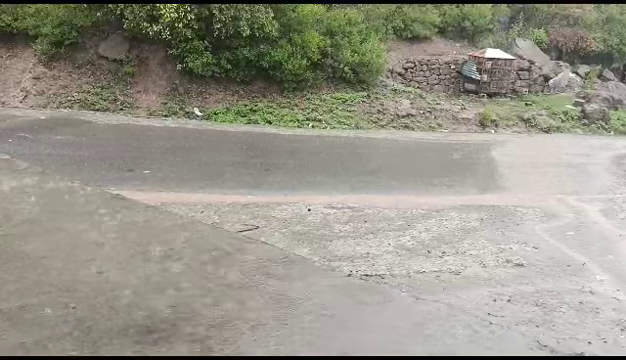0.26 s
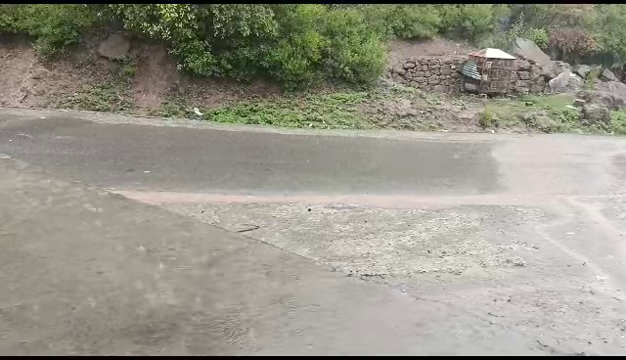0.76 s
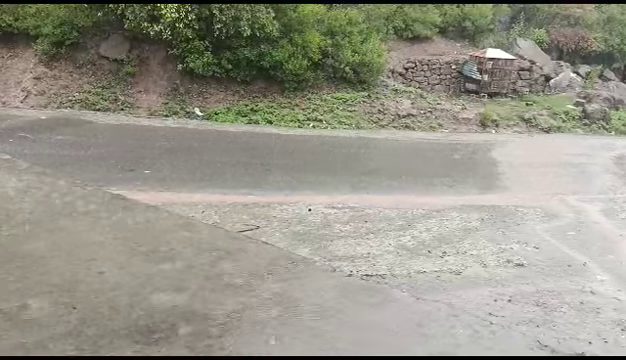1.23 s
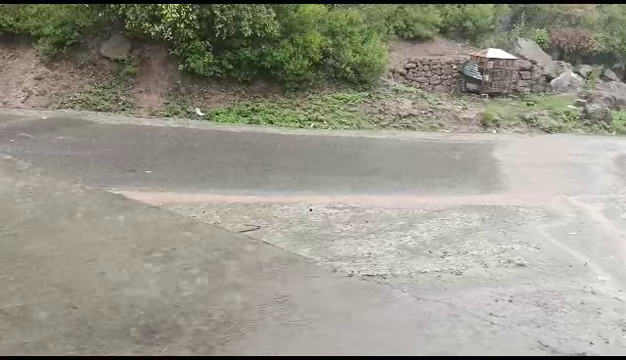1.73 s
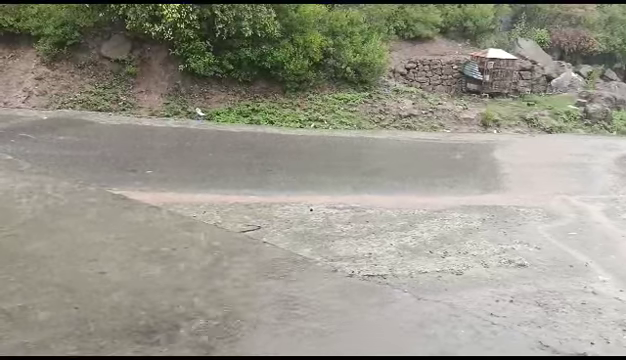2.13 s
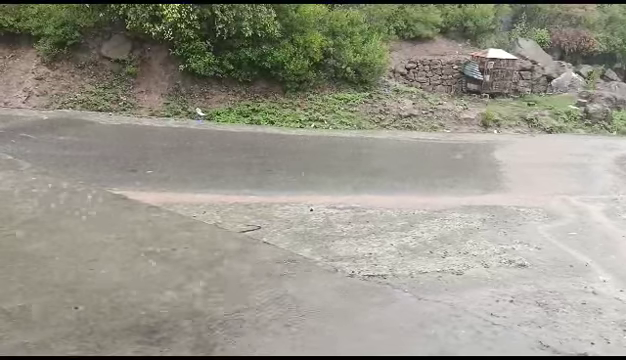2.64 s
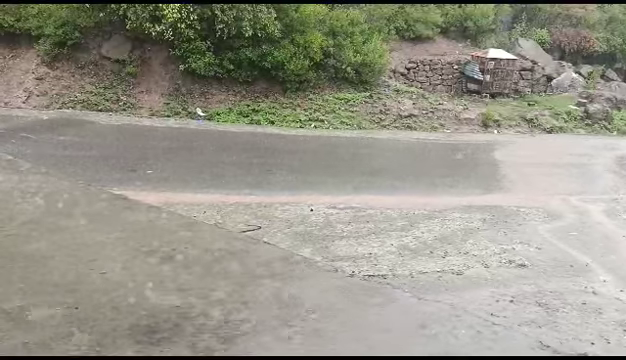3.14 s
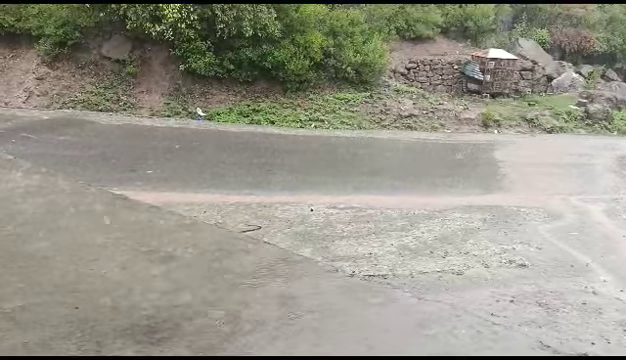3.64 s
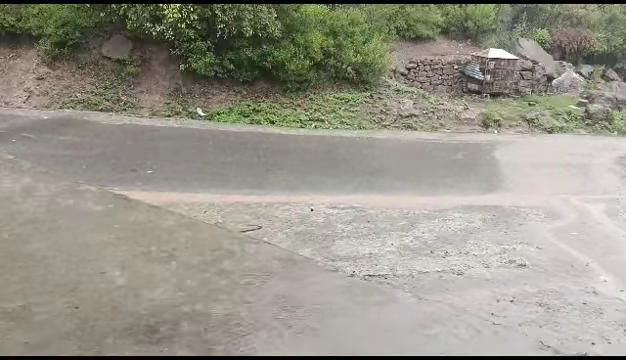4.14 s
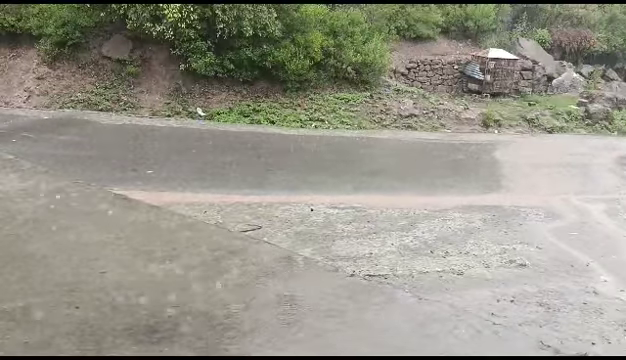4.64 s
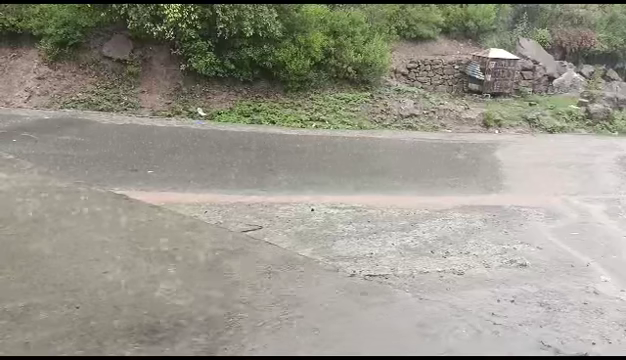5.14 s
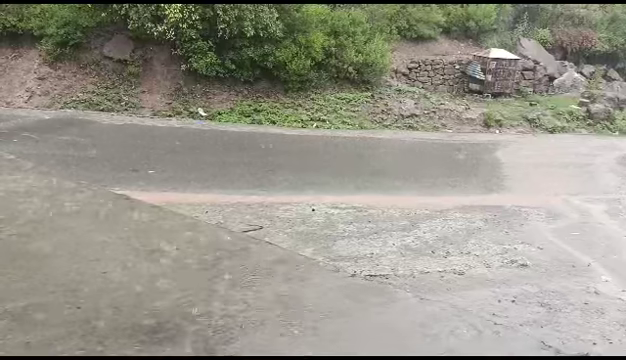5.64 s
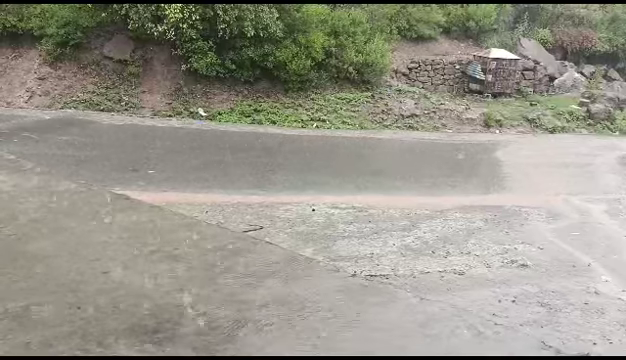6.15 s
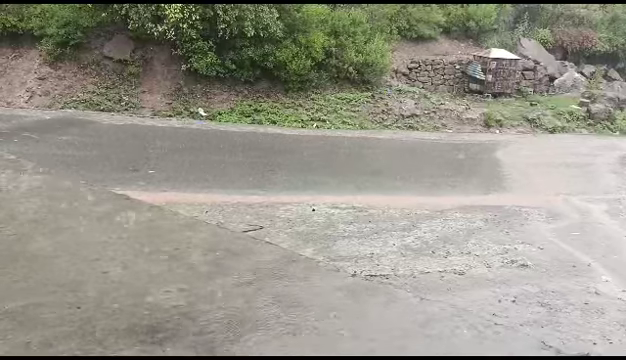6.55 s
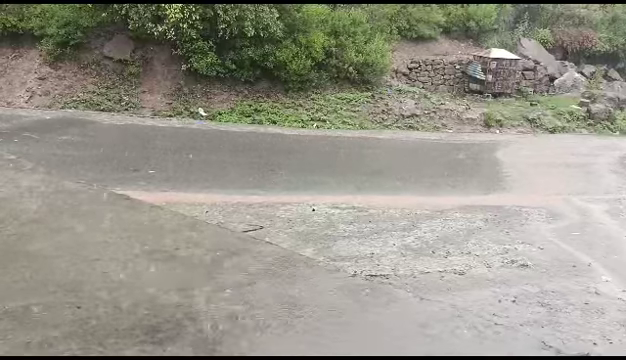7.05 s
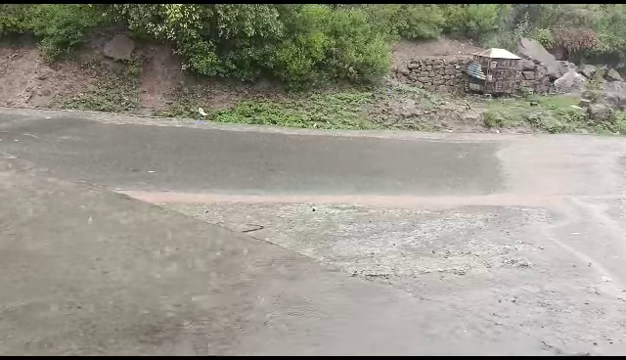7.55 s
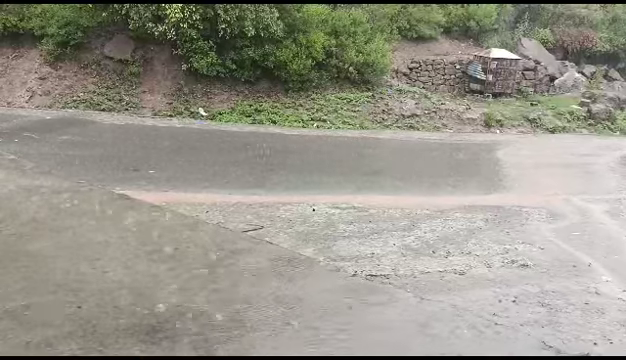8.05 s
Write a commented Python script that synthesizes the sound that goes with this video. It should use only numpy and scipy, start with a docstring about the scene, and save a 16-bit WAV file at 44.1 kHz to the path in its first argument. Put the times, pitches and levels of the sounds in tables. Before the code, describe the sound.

Constant rainfall on wet asphalt, crisp close drips and heavier splats over a dull distant wash, with slight hand creaks and one quick triple bump.

```python
"""Steady rain on a wet road, heard through the two unlike microphone ports of a hand-held phone.
Far rain is a wash of wandering noise over a dull roar; near drops patter as random clicks with a spray.
Hard drops tick, heavy ones splat as short damped tones with a spatter, spills are shaped noise bursts,
and bubbles sing as damped tones. The grip rubs as resonant noise, creaks as a wavering slip tone
and knocks the case into ringing with three quick blows."""
import sys
import numpy as np
from scipy import signal
from scipy.fft import rfft, irfft
from scipy.io import wavfile
from scipy.ndimage import uniform_filter1d

SR = 44100
rng = np.random.default_rng(int(sys.argv[2]) if len(sys.argv) > 2 else 0)


def transcribe(u):
    """Save the signal u as a 16-bit wav file named by the first command-line argument.

    u: samples, shape (n,) or (channels, n), limited to [-1, 1]; the rate is SR.
    q: integer samples, one column per channel.
    """
    v = np.clip(np.atleast_2d(u).T, -1, 1)
    q = np.round(v * 32767).astype(np.int16)
    wavfile.write(sys.argv[1], SR, q)


N = 365570


def gain_of(db):
    """Amplitude factor for a level in dB."""
    return 10 ** (np.asarray(db) / 20)


def evened(x):
    """Bring a signal to an rms of one."""
    return x / np.sqrt(np.mean(x ** 2) + 1e-20)


def read(points, hz):
    """Read a curve between its points on a logarithmic frequency scale."""
    point_hz, value = np.transpose(points)
    return np.interp(np.log(hz + 1), np.log(point_hz + 1), value)


def over_time(rows, t):
    """Read each column of a table whose first column is time."""
    s, *columns = np.transpose(rows)
    return [np.interp(t, s, column) for column in columns]


def add(mix, s, sound):
    """Lay a sound into the mix at s seconds, cut off at the mix's end."""
    part = mix[..., round(s * SR):][..., :sound.shape[-1]]
    part += sound[..., :part.shape[-1]]


def resonate(x, hz, width):
    """Two passes of a one-pole resonance of the given width in Hz."""
    pole = np.exp((2j * np.pi * hz - np.pi * width) / SR)
    return signal.lfilter([1], [1, -2 * pole, pole ** 2], x).real


def ping(hz, t60, rise, glide=0.):
    """A damped tone of peak one whose pitch may climb, as a bubble's does."""
    t = np.arange(round(t60 * SR)) / SR
    tone = np.sin(2 * np.pi * hz * t * (1 + glide * t / t60))
    tone = tone * gain_of(-60 * t / t60) * (1 - np.exp(-t / rise))
    return tone / abs(tone).max()


# Strength of the near rain. Each row: time in seconds, strength in dB (only its changes are used).
RAIN = [(0.0, -50), (0.46, -50.5), (0.71, -49), (1.15, -50.5), (2.12, -49.5), (2.52, -49), (2.7, -50),
        (3.05, -49), (3.55, -49.5), (4.2, -50.5), (4.82, -49), (5.38, -50), (6.19, -49.5), (6.72, -50.5),
        (7.06, -49.5), (8.29, -49.5)]
QUICK_DB, QUICK_HZ = .65, (2.5, 14)  # quick changes of the near rain: rms depth, range of rates
QUICK_TURNS = rng.random(30)  # their starting phases in turns


def rainfall(t):
    """Slow and quick changes of the near rain in dB; the right port hears less of them."""
    db, = over_time(RAIN, t)
    rates = np.geomspace(*QUICK_HZ, len(QUICK_TURNS))
    quick = evened(sum(np.sin(2 * np.pi * (hz * t + turn)) for hz, turn in zip(rates, QUICK_TURNS)))
    return (db - db.mean() + QUICK_DB * quick) * np.array([[1], [.6]])


# Likeness of the two ports in the far rain. Each row: frequency in Hz, left-right correlation.
SAME = [(60, .93), (130, .9), (290, 0.8), (640, .48), (1000, 0), (1300, -0.55), (1700, -0.2), (2200, 0)]


def port_pair(left, other, hz):
    """Left and right spectra as alike as SAME tells at each frequency."""
    same = np.clip(read(SAME, hz), -1, 1).reshape(-1, *[1] * (left.ndim - 1))
    return np.array([left, same * left + np.sqrt(1 - same ** 2) * other])


def wash():
    """Far rain as noise whose level wanders at random; the ports' main band follows the near rain most."""
    frames, hz = N // 128 + 5, np.fft.rfftfreq(512, 1 / SR)
    a, b, c, d, broad, narrow = rng.standard_normal((frames, 257, 6)).T
    # slow random level changes in narrow bands, quicker ones in broader bands
    narrow = uniform_filter1d(uniform_filter1d(narrow, size=3, axis=0), size=40, axis=1)
    broad = uniform_filter1d(uniform_filter1d(broad, size=4, axis=0), size=10, axis=1)
    flicker = evened(uniform_filter1d(rng.standard_normal(frames), size=3))
    # the treble comes and goes
    breathing = evened(uniform_filter1d(rng.standard_normal(frames), size=30))
    treble = read([(8000, 0), (13000, 1.0)], hz)[:, None]
    wander_db = 1.2 * evened(broad) + 2.0 * evened(narrow) + treble * breathing

    follows = read([(1700, 0.02), (3000, 0.98), (4800, 0.95), (8000, 0.69)], hz)[:, None]
    near_db = rainfall(np.arange(frames) * 128 / SR)[:, None]
    z = port_pair(a + 1j * b, c + 1j * d, hz)
    z *= gain_of(wander_db + follows * (near_db + 0.6 * flicker))
    return gain_of(-2.5) * evened(signal.istft(z, nperseg=512, noverlap=384)[1][:, :N])


# Spectrum of the distant roar. Each row: frequency in Hz, density in dB per Hz.
LOW_WASH = [(20, -120), (50, -116), (90, -107), (200, -101), (400, -102.5), (650, -100), (850, -96),
            (1100, -96), (1500, -115)]


def low_wash():
    """The dull roar of rain over the hillside as shaped noise, most alike at both ports in the bass."""
    hz = np.fft.rfftfreq(N, 1 / SR)
    left, other = rfft(rng.standard_normal((2, N)))
    z = port_pair(left, other, hz)
    return np.sqrt(SR / 2) * irfft(z * gain_of(read(LOW_WASH, hz)), N)


def patter(per_s, spread_db, level_db):
    """Random drops as single-sample clicks, a few of them large, each nearer one port or the other."""
    size = gain_of(spread_db * np.minimum(rng.exponential(1, N), 4.5))
    size *= rng.choice([-1, 1], N) * (rng.random(N) < per_s / SR)
    side = rng.random(N) * np.pi / 2
    drops = size * np.array([np.cos(side), np.sin(side)]) * gain_of(rainfall(np.arange(N) / SR))
    return gain_of(level_db) * evened(drops)


# the scatter of droplets after a drop: level against a hard drop in dB, decay time in s
SPRAY_DB, SPRAY_T60 = -19.5, 0.03


def near_drops():
    """Soft drops push slowly and are dull; the smaller and harder, the brighter; all but the dull spray."""
    dull = signal.oaconvolve(patter(900, 5.4, -23.5), signal.windows.hann(7)[None], axes=1)[:, :N]
    # each difference between neighbouring samples tilts a click towards the treble
    crisp = np.diff(patter(500, 4.0, -13), prepend=0)
    bright = np.diff(patter(1100, 3.6, -10.5), n=2, prepend=0, append=0)
    t = np.arange(1000) / SR
    spray = gain_of(-31.0 - 60 * t / SPRAY_T60) * rng.standard_normal((2, len(t)))
    spray[:, 0] = 1  # the drop itself
    return dull + signal.oaconvolve(crisp + bright, spray, axes=1)[:, :N]


def causal(points):
    """Impulse response of least delay for a spectrum in dB."""
    log_gain = read(points, np.abs(np.fft.fftfreq(4096, 1 / SR))) * np.log(10) / 20
    return np.fft.ifft(np.exp(np.conj(signal.hilbert(log_gain)))).real[:1024]


# Colour each microphone port gives the rain. Each row: frequency in Hz, response in dB per Hz.
LEFT_PORT = [(900, -101.5), (1210, -93.5), (1330, -80.5), (1900, -90), (2400, -85), (2800, -80.5),
             (3150, -74), (3650, -70.5), (4600, -80), (5080, -88.5), (5500, -82.5), (9300, -92.5),
             (10200, -85), (11400, -93.5), (14000, -97), (15800, -103)]
RIGHT_PORT = [(900, -100), (1220, -92), (1350, -79), (2000, -89.5), (2800, -91), (3800, -86.5), (4400, -85),
              (5050, -89), (5550, -89.5), (7700, -88.5), (9400, -108), (10600, -106), (11400, -115),
              (12500, -106), (15800, -113)]


def through_ports(x):
    """Each port filters the rain with its own resonances."""
    ports = np.array([causal(LEFT_PORT), causal(RIGHT_PORT)])
    return np.sqrt(SR / 2) * signal.oaconvolve(x, ports, axes=1)[:, :N]


STRAY_COUNT, STRAY_HZ = 320, (5030, 12100)  # number of lesser drops, range of their pitch
# near the least left level, dB per natural-log unit of size, mean right level against left
STRAY_DB, STRAY_SPREAD_DB, STRAY_RIGHT_DB = -43, 3.5, -42


def strays():
    """Lesser hard drops at random moments, each a short ping of its own pitch with its spray."""
    out, t = np.zeros((2, N)), np.arange(1000) / SR
    sprays = rng.standard_normal((STRAY_COUNT, len(t)))
    for (when, size, side, pitch), spray in zip(rng.random((STRAY_COUNT, 4)), sprays):
        right_db = STRAY_RIGHT_DB + 16 * (side - .5)
        db = STRAY_DB - STRAY_SPREAD_DB * np.log(size + 0.039) + np.array([[0], [right_db]])
        hz = STRAY_HZ[0] * (STRAY_HZ[1] / STRAY_HZ[0]) ** pitch
        add(out, when * N / SR, gain_of(db) * ping(hz, 9 / hz, 1e-4))
        spray_gain = gain_of(db + SPRAY_DB - 60 * t / SPRAY_T60)
        add(out, when * N / SR, spray_gain * evened(resonate(spray, hz, 2500)))
    return out


BUBBLE_COUNT, BUBBLE_HZ, BUBBLE_T60 = 500, (2726, 4825), .025  # number, pitch range, decay in s
BUBBLE_DB, BUBBLE_RIGHT_DB = -54, -10  # near the least left level, mean right level against left


def bubbles():
    """Many faint bubble tones in the puddles, at random moments, each climbing a little."""
    out = np.zeros((2, N))
    for when, size, side, pitch in rng.random((BUBBLE_COUNT, 4)):
        right_db = BUBBLE_RIGHT_DB + 12 * (side - .5)
        db = BUBBLE_DB - 3.3 * np.log(size + 0.042) + np.array([[0], [right_db]])
        # pitches crowd towards the middle of the range
        hz = BUBBLE_HZ[0] + (BUBBLE_HZ[1] - BUBBLE_HZ[0]) * np.arccos(1 - 2 * pitch) / np.pi
        add(out, when * N / SR, gain_of(db) * ping(hz, BUBBLE_T60, 0.0005, 0.072))
    return out


# The hand nudging the case. Each row: peak time in seconds, low shake in dB, shell ring in dB.
NUDGES = [(.26, -89, -71), (.7, -67, -67), (.8, -76, -65), (1.17, -94, -66.5), (1.37, -69, -67),
          (1.57, -66, -64.5), (1.87, -74, -68), (2.04, -70, -88), (2.26, -84, -70), (2.58, -62.5, -89),
          (2.67, -68, -72), (2.77, -57, -77), (3.0, -67, -69), (3.15, -62, -80), (3.351, -55, -63.5),
          (3.459, -74, -71), (3.54, -56, -77), (3.71, -62, -69), (3.8, -61, -76), (3.9, -65, -66),
          (4.01, -78, -61.5), (4.08, -71, -91), (4.49, -65, -96), (4.68, -58.5, -86), (5.2, -69, -88),
          (5.27, -90, -58), (5.51, -66, -61), (6.25, -77, -64), (6.46, -66, -78), (7.478, -95, -60),
          (7.584, -95, -64)]
NUDGE_RISE_DB_PER_S, NUDGE_FALL_DB_PER_S = 390, 257
SHAKE_HZ, SHELL_HZ = 91.6, 222
TREMOR_DB = (-93.5, -83.5)  # the hand at rest: low shake, shell ring


def grip():
    """Each nudge swells and fades as rubbing noise that shakes the hand and rings the shell."""
    shake, shell = rng.standard_normal((2, N))
    rub = np.array([evened(resonate(shake, SHAKE_HZ, 62)), evened(resonate(shell, SHELL_HZ, 62))])
    t = np.arange(-.2, .3, 1 / SR)
    swell = gain_of(np.where(t < 0, NUDGE_RISE_DB_PER_S * t, -NUDGE_FALL_DB_PER_S * t))
    level = gain_of(TREMOR_DB)[:, None] * np.ones(N)
    for s, *db in NUDGES:
        add(level, s + t[0], gain_of(db)[:, None] * swell)
    return (level * rub).sum(0)


def tick(hz, spray, turn):
    """A snap a few cycles long, its crackle and a short spray; each port hears its own."""
    t = np.arange(spray.shape[-1]) / SR
    snap = np.cos(2 * np.pi * (hz * (t - 2e-4) + turn)) * np.exp(-((t - 2e-4) / 8e-5) ** 2)
    crackle = .55 * gain_of(-60 * t / .006) * evened(resonate(spray, hz, 5000))
    droplets = evened(resonate(spray, hz, 2200)) * gain_of(SPRAY_DB - 60 * t / SPRAY_T60)
    return snap + crackle + droplets


PORT_LAG = 17  # samples by which a tick or splat reaches the right port later


def right_later(x):
    """Delay the right port by its longer path."""
    return np.array([x[0], np.roll(x[1], PORT_LAG)])


# The loudest sharp drops on something hard.
# Each row: time in seconds, left level in dB, right level in dB, pitch in Hz.
TICKS = [(0.1963, -34, -55, 10600), (0.2525, -28, -38, 8600), (0.4024, -33, -46, 11800),
         (0.6018, -35, -48, 7400), (0.8146, -35, -51, 9600), (0.9012, -34, -55, 8600),
         (1.1454, -33, -48, 10900), (1.3206, -34, -54, 7200), (1.5082, -33, -47, 7600),
         (2.1358, -31, -45, 8300), (2.1839, -35, -41, 7600), (2.4232, -30, -49, 12400),
         (2.5162, -34, -46, 7600), (2.5387, -30, -43, 9700), (2.6313, -33, -51, 11900),
         (2.6754, -33, -51, 12900), (2.9596, -34, -47, 12500), (3.0541, -31, -55, 13200),
         (3.1699, -35, -41, 9700), (3.2345, -30, -45, 8100), (3.2703, -33, -46, 10800),
         (3.6922, -31, -40, 9900), (3.7912, -33, -55, 8000), (3.8327, -30, -43, 10600),
         (3.8763, -31, -41, 9400), (4.1729, -34, -46, 11500), (4.1823, -34, -55, 11800),
         (4.4062, -31, -37, 11300), (4.6468, -29, -48, 5500), (4.6749, -35, -43, 8000),
         (4.8094, -35, -55, 10400), (4.8558, -34, -42, 7300), (4.8726, -34, -35, 8500),
         (4.9203, -35, -54, 10600), (5.1322, -35, -48, 11800), (5.1671, -31, -55, 10300),
         (5.2386, -31, -40, 10600), (5.2908, -33, -43, 11500), (5.322, -32, -47, 10100),
         (5.5125, -35, -48, 7300), (5.5319, -34, -44, 10700), (5.652, -34, -48, 11100),
         (5.7856, -34, -47, 10300), (5.9027, -34, -55, 12100), (5.9581, -28, -44, 11300),
         (5.9855, -30, -45, 12700), (6.1002, -33, -44, 8700), (6.3544, -28, -37, 11700),
         (6.4377, -34, -46, 8100), (6.7257, -29, -35, 9200), (6.7507, -31, -51, 11900),
         (6.8694, -24, -30, 12000), (6.9699, -34, -41, 9700), (7.0154, -34, -43, 10500),
         (7.041, -35, -47, 10200), (7.2376, -28, -47, 11200), (7.4411, -33, -47, 11600),
         (7.5137, -34, -43, 7400), (7.5222, -31, -57, 13800), (7.7985, -34, -48, 10900),
         (7.8251, -37, -44, 7200), (7.9432, -35, -53, 8700), (8.0011, -34, -42, 7000),
         (8.0524, -31, -44, 7900), (8.1619, -30, -38, 9700), (8.1724, -35, -49, 7800),
         (8.2232, -31, -44, 10400)]


def ticks():
    """The sharpest drops, with the snap at a random phase in the right port."""
    out = np.zeros((2, N))
    sprays = rng.standard_normal((len(TICKS), 2, 1200))
    for (s, *db, hz), spray, turn in zip(TICKS, sprays, rng.random(len(TICKS))):
        add(out, s - 2e-4, gain_of(db)[:, None] * tick(hz, spray, np.array([[0], [turn]])))
    return right_later(out)


# The loudest heavy drops on the wet road.
# Each row: time in seconds, left level in dB, right level in dB, pitch in Hz.
SPLATS = [(0.2706, -32, -55, 3790), (0.6482, -22, -36, 3650), (0.6573, -33, -44, 3590),
          (0.6879, -32, -42, 3580), (0.6941, -37, -39, 3770), (0.7158, -34, -42, 3730),
          (0.7882, -33, -44, 3310), (1.066, -33, -50, 3540), (1.3307, -33, -41, 3860),
          (1.6566, -33, -55, 3560), (1.779, -28, -41, 3910), (1.8684, -33, -55, 3500),
          (1.96, -31, -49, 4600), (2.1422, -33, -40, 3730), (2.1853, -32, -45, 3910),
          (2.5463, -32, -54, 3830), (2.5562, -33, -45, 4130), (2.7027, -32, -50, 3590),
          (2.9968, -33, -55, 3590), (3.0094, -33, -51, 3480), (3.1892, -33, -51, 3310),
          (3.2898, -29, -47, 3840), (3.2996, -32, -51, 3720), (3.5535, -24, -35, 3770),
          (3.6307, -33, -49, 3390), (3.7487, -33, -50, 3460), (4.2978, -34, -41, 3500),
          (4.5605, -36, -33, 4300), (4.5692, -54, -34, 4190), (4.5815, -26, -28, 4400),
          (4.5959, -34, -39, 3940), (4.6463, -22, -43, 3500), (4.6521, -33, -47, 3490),
          (4.6662, -29, -49, 3780), (4.6776, -33, -46, 3540), (5.11, -32, -55, 3450),
          (5.143, -30, -45, 3490), (5.263, -33, -47, 3420), (5.7953, -32, -53, 3510),
          (5.9447, -32, -55, 3980), (6.156, -33, -44, 3710), (6.2922, -28, -50, 3820),
          (6.3279, -36, -33, 3650), (6.3361, -28, -46, 3510), (6.3422, -25, -31, 3890),
          (6.7384, -33, -55, 3540), (6.7511, -32, -43, 3790), (7.0056, -33, -55, 3960),
          (7.0501, -33, -55, 4050), (7.2858, -32, -41, 3450), (7.8389, -32, -51, 3490),
          (7.9765, -33, -43, 3630), (8.1839, -34, -49, 3690), (8.2009, -30, -48, 3660),
          (8.2538, -32, -44, 4010)]


def splats():
    """Each heavy drop is a dull blow with a short ring and a broad spatter."""
    out, t = np.zeros((2, N)), np.arange(900) / SR
    for (s, *db, hz), noise in zip(SPLATS, rng.standard_normal((len(SPLATS), 2, len(t)))):
        level = gain_of(db)[:, None]
        spatter = gain_of(-13 - 60 * t / .015) * evened(resonate(noise, 5500, 5000))
        add(out, s - 4e-4, level * ping(hz, .0038, 2e-4))
        add(out, s - 3e-4, level * spatter)
    return right_later(out)


# Water spilling close by, a burst of droplets. Each row: start in seconds, left level in dB,
# right level in dB (both before the rise and decay), rise in seconds, 60 dB decay in seconds.
SPILLS = [(.686, -57, -43, 0.0023, 0.45), (2.809, -55, -39, 0.0092, 0.19), (3.551, -44.5, -47, 0.0017, 0.6),
          (4.556, -42, -43.5, 0.016, 0.6), (4.645, -43, -56, .001, 0.078),
          (5.238, -37.5, -41, 0.0089, 0.23), (6.312, -37.5, -38, 0.011, 0.27),
          (6.939, -41.5, -46, 0.011, 0.44), (7.272, -41.5, -69, .005, 0.37), (8.262, -39, -39, 0.012, 0.39)]


def spills():
    """Dense droplets, grainy, dying away in the band of the splats."""
    out, t = np.zeros((2, N)), np.arange(SR // 2) / SR
    for s, left_db, right_db, rise, t60 in SPILLS:
        droplets = rng.standard_normal((2, len(t))) * (rng.random((2, len(t))) < .05)
        hiss = evened(resonate(droplets, 3880, 1900))
        envelope = gain_of(-60 * t / t60) * (1 - np.exp(-t / rise))
        add(out, s, gain_of([[left_db], [right_db]]) * hiss * envelope)
    return out


# Skin slipping on the case sings, one list for each creak.
# Each row: time in seconds, pitch in Hz, level in dB (pitch and level waver about these).
CREAKS = [
    [(1.528, 165, -72), (1.54, 162, -63), (1.554, 145, -48), (1.566, 102, -52), (1.585, 128, -66),
     (1.605, 138, -57), (1.628, 140, -76)],
    [(2.7, 148, -54), (2.754, 142, -50.5), (2.81, 118, -57), (2.908, 161, -53.5), (2.974, 130.4, -61),
     (3.016, 133, -67), (3.098, 156.4, -52.5), (3.142, 171.8, -60.5), (3.342, 169, -58.5), (3.4, 216, -70)],
    [(3.65, 217, -72), (3.694, 233.4, -52.5), (3.762, 216, -58), (3.792, 215, -83), (3.828, 217, -49.5),
     (3.86, 239, -100)],
    [(5.5, 194, -75), (5.565, 260, -62), (5.6, 247, -74)],
]


def creak(rows):
    """A nearly pure, slightly unsteady slip tone, returned after its start time."""
    t = np.arange(rows[0][0], rows[-1][0], 1 / SR)
    hz, db = over_time(rows, t)
    wobble = evened(uniform_filter1d(rng.standard_normal(len(t)), size=900))
    phase = 2 * np.pi * np.cumsum(hz * (1 + .035 * wobble)) / SR
    grab = evened(uniform_filter1d(rng.standard_normal(len(t)), size=400))
    tone = np.sin(phase) + .08 * np.sin(2 * phase) + .04 * np.sin(3 * phase)
    tone = gain_of(2.5 * grab) * tone
    return rows[0][0], np.sqrt(2) * gain_of(db) * tone * signal.windows.tukey(len(t), .1)


# Drops that trap a bubble in a puddle. Each row: start in seconds, left level in dB,
# right level in dB, starting pitch in Hz, 60 dB decay in seconds.
PLOPS = [(1.648, -52, -57, 2470, 0.027), (2.48, -64, -39, 1260, 0.013), (2.492, -55, -45.5, 1370, 0.047),
         (2.502, -69, -56, 1073, 0.15), (2.919, -59, -46, 1430, 0.064), (3.963, -54, -47, 2380, 0.058),
         (3.991, -52, -57, 2350, 0.047), (4.806, -55, -57, 2160, 0.061), (6.791, -65, -53, 1440, 0.058),
         (7.691, -43, -57, 2680, 0.047), (8.179, -45.5, -64, 2460, 0.088), (8.19, -53, -60, 2140, 0.19),
         (2.915, -64, -61, 880, .1), (4.643, -35, -53, 3000, 0.018)]


def plops():
    """Short bubble tones that climb a little, each in a small splash of noise about its pitch."""
    out = np.zeros((2, N))
    splashes = rng.standard_normal((len(PLOPS), SR // 5))
    for (s, left_db, right_db, hz, t60), splash in zip(PLOPS, splashes):
        tone = ping(hz, t60, 0.0049, 0.019)
        fizz = evened(resonate(splash[:len(tone)], hz, 700)) * gain_of(np.linspace(-9, -50, len(tone)))
        add(out, s, gain_of([[left_db], [right_db]]) * (tone + fizz))
    return out


# Three quick blows of the hand on the case. Each row: start in seconds, peak level in dB,
# lift of the top mode in dB, strength of the blow against the rattle, rattle length in seconds.
KNOCKS = [(6.7, -27.5, -9, 0.91, 0.072), (6.774, -43, -9, 0.73, 0.061), (6.858, -43.5, 30, 0.036, 0.058)]
# Ringing modes of the case. Each row: frequency in Hz, relative level in dB,
# 60 dB decay in seconds, left over right in dB.
CASE = [(85, -9, 0.2, 1), (115, -10, 0.2, -3), (157, 3.5, 0.133, 1), (194, 16.5, 0.055, -1.5),
        (248, 7, 0.085, 1), (293, -2, 0.12, 2), (389, 1.5, 0.073, -6), (438, -3.5, 0.1, 11),
        (520, -25, .06, -6), (695, -19.5, 0.045, 17)]


def knock(db, top_db, blow, rattle_s):
    """A soft blow, then a brief rattle that keeps shaking the case modes, which each port hears apart."""
    t = np.arange(SR // 2) / SR
    modes = []
    for hz, mode_db, t60, pan_db in CASE:
        pan = np.array([[pan_db / 2], [-pan_db / 2]])
        modes.append(gain_of(mode_db - 60 * t / t60 + pan) * np.sin(2 * np.pi * hz * t))
    ring = (sum(modes[:-1]) + gain_of(top_db) * modes[-1]) * (1 - np.exp(-t / 0.0054))

    # sparse random hits that swell quickly and fade over the rattle
    hits = rng.standard_normal(len(t)) * (rng.random(len(t)) < .008)
    swell = np.sqrt(np.sin(np.pi * np.sqrt(np.minimum(t / rattle_s, 1))).clip(0))
    force = 0.15 * hits * swell
    force[:100] += blow * signal.windows.hann(100) / 50
    sound = signal.fftconvolve(force[None], ring, axes=1)[:, :len(t)]
    return -gain_of(db) * sound / abs(sound).max()


def scene():
    """Rain in all its layers, with the sounds of the hand on the case."""
    rain = through_ports(wash() + near_drops()) + low_wash()
    rain += strays() + bubbles() + ticks() + splats() + spills() + plops()

    hand = grip() * np.ones((2, 1))
    for rows in CREAKS:
        add(hand, *creak(rows))
    for s, *blow in KNOCKS:
        add(hand, s, knock(*blow))
    # the case flexes, so the two ports move a little out of step
    flex = 0.11 * signal.hilbert(hand.mean(0)).imag * np.array([[1], [-1]])
    return rain + hand + flex


LOW_CUT_HZ, EDGE_HZ = 60, 15850


def record(dry):
    """The microphones' bass cut and the band limit of the recorder."""
    bass_cut = signal.butter(N=2, Wn=LOW_CUT_HZ, btype="high", fs=SR, output="sos")
    cut = signal.sosfilt(bass_cut, dry)
    band_limit = signal.firwin(511, EDGE_HZ, window=("kaiser", 9), fs=SR)
    return signal.oaconvolve(cut, band_limit[None], "same")


dry = scene()
out = record(dry)
transcribe(out)
```